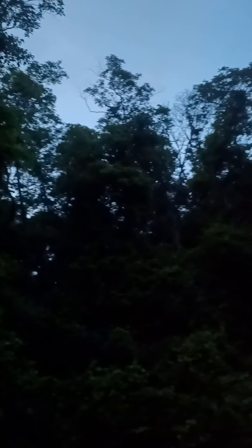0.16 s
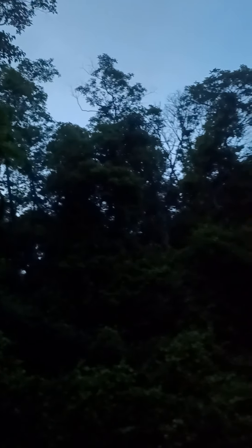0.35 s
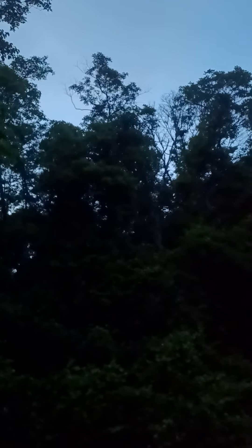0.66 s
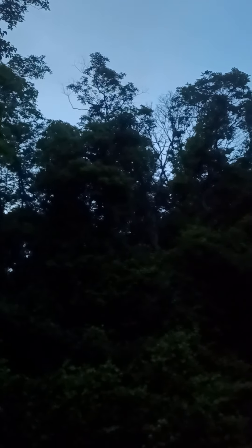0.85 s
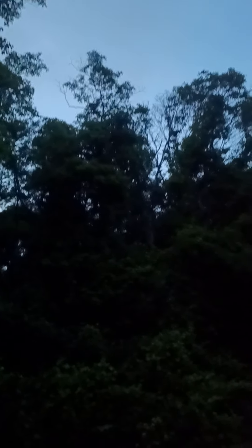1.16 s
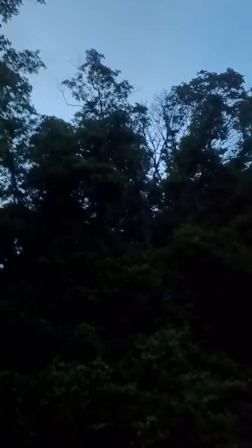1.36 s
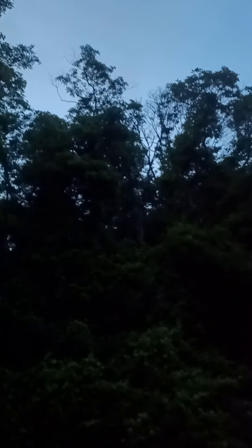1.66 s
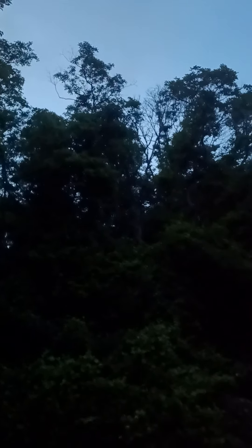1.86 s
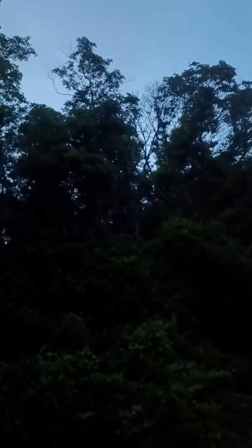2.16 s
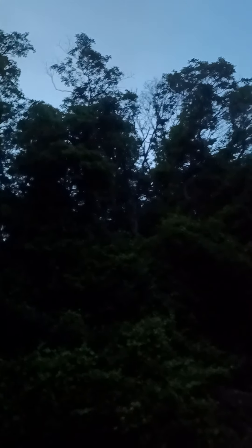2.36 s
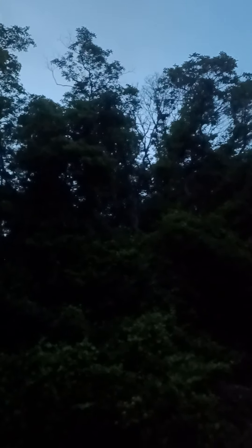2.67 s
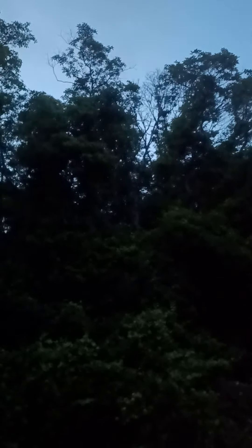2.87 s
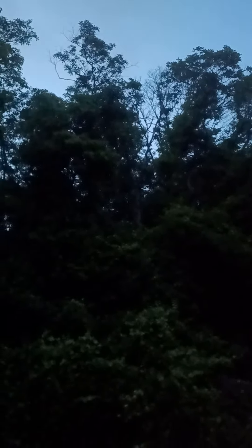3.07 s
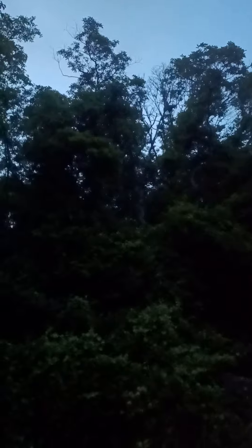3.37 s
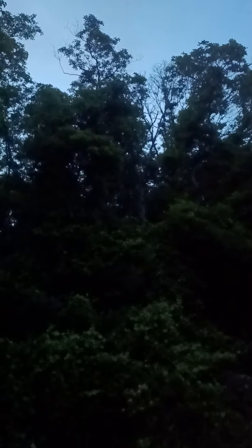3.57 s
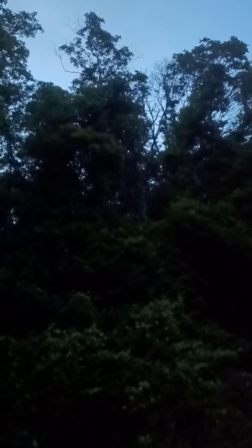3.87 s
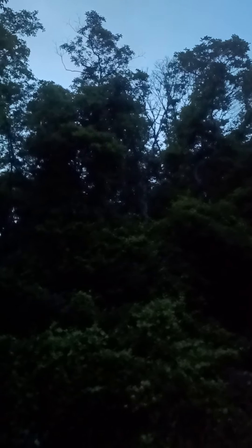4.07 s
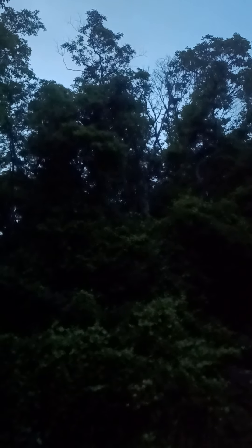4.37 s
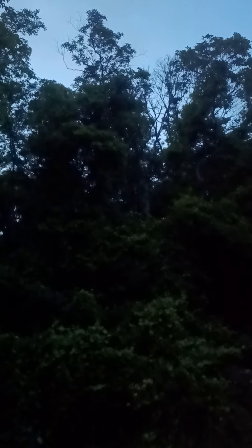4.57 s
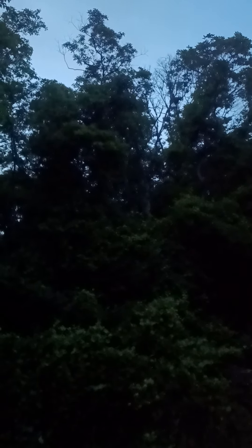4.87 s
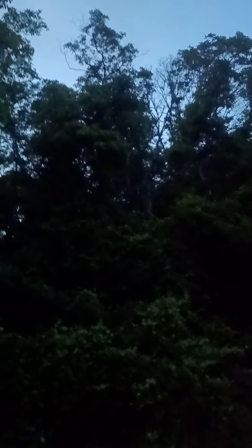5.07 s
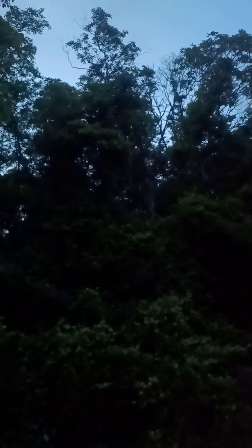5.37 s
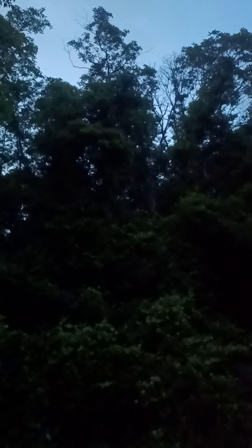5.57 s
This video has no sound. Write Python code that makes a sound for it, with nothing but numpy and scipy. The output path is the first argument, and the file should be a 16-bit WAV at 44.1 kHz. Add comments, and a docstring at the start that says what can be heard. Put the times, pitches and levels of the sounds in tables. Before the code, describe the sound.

A nightjar sings two clear, rolling whistled phrases in an echoing wood at dusk, with distant treefrog trills, a faint high insect tone and soft hiss.

```python
"""A forest edge at dusk: a chuck-will's-widow sings twice while the echo of an earlier phrase still fades.
Each phrase is a falling chuck, a swooping whistle, a brief hiccup and a second swooping whistle: gliding tones
whose overtones grow with pitch, heard directly, in echoes off trunks and in a diffuse tail from foliage.
Treefrogs trill further off as trains of short rising pulses; shaped noise makes the far frogs, thin high
insects, low distant rumble, microphone hiss, one faint rustle and a soft bump that dies away at the start."""
import sys
import numpy as np
from scipy import signal
from scipy.fft import rfft, irfft, next_fast_len
from scipy.io import wavfile
from scipy.ndimage import map_coordinates

SR = 44100
rng = np.random.default_rng(int(sys.argv[2]) if len(sys.argv) > 2 else 0)


def to_wav(sig):
    """Store sig (one row per channel, or 1-D mono) as 16-bit WAV at the path in sys.argv[1].

    Samples outside -1..1 are clipped; the rate is SR.
    """
    pcm = np.clip(np.atleast_2d(sig), -1, 1) * 32767
    pcm = np.round(pcm).astype(np.int16)
    wavfile.write(sys.argv[1], SR, pcm.T)  # frames by channels


N = 252687  # length in samples

# Notes, before the song's pitch and length ratios: length, attack and release in s,
# and base pitch f/Hz at start, middle and end.
# Swoop columns: peak t/s into the note, height f/Hz, rise t/s, fall t/s, accent level/dB
CHUCK = dict(length_s=.04, attack_s=.002, release_s=.0187, base_hz=(1200, 1160, 1120),
         swoops=[(0, 1280, .015, .0215, 0)])
WILL = dict(length_s=.259, attack_s=.046, release_s=.0164, base_hz=(1187, 1163, 1106),
        swoops=[(.1125, 1380, .018, .009, -1.5), (.17, 594, .0117, .0258, 3.7),
        (.2264, 490, .0161, .0196, 1.8)])
HICCUP = dict(length_s=.0262, attack_s=.013, release_s=.0073, base_hz=(1250, 1233, 1192), swoops=[])
WIDOW = dict(length_s=.238, attack_s=.026, release_s=.05, base_hz=(1103, 1292, 880),
         swoops=[(.0516, 73, .0104, .0194, 2.8), (.1105, 1290, .0145, .009, -4.5),
         (.1559, 581, .0086, .0148, -4.5)])
# Order of notes in a phrase, t before the length ratio.
# Columns: t/s into the phrase, note, level/dB, overtone level/dB, foliage echo level/dB
PHRASE = [(0, CHUCK, -34.6, -6, 4), (.307, WILL, -28.3, -1.5, .5), (.633, HICCUP, -22, 0, -5),
          (.6935, WIDOW, -26.5, 1.2, .6)]
# Phrases sung. Columns: start t/s, level/dB, pitch ratio, length ratio
SONG = [(-.94, .5, .97, 1.0), (2.2925, 0, 1.0, 1.0), (4.3505, -.3, 1.003, .9887)]
# Echoes from single trunks. Columns: delay t/s, level/dB, lead of the left microphone t/s
TRUNK_ECHOES = [(.00517, -10, -.00011), (.01517, -14.5, -.00031), (.02372, -16, 0),
                (.03407, -16.5, -.00021), (.07087, -18, -.0048), (.0758, -26, -.0003), (.1169, -26, .0001)]
# Reverberation of the near foliage and of the deep wood. Columns: f/Hz, time to decay 60 dB t/s
FOLIAGE_DECAY = [(900, 0.34), (1800, 0.46), (5000, 0.61), (12000, 0.36)]
DEEP_WOOD_DECAY = [(900, 1.32), (1800, 1.045), (5000, 1.8), (12000, 1.5)]
# Stereo balance of the bird. Columns: f/Hz, left minus right level/dB
BIRD_BALANCE = [(1200, 4.5), (1750, -3.5), (2300, -0.3), (4500, -7.5), (8000, -6.5), (12000, -7.5)]


def nightjar(direct_db=0.03, lead_s=-0.000085, deep_db=-15):
    """Multipath propagation: direct sound, trunk echoes and scattering add, the right microphone leading."""
    song, near = np.zeros(N + SR), np.zeros((2, N + SR))
    for start, gain_db, pitch, stretch in SONG:
        for offset, note, db, edge_db, scatter_db in PHRASE:
            s = start + offset * stretch
            tone = amp(gain_db + db) * whistle(note, pitch, stretch, edge_db)
            add(song, s, tone)
            # every note has its own randomly drawn diffuse tail
            scattered = filtered(np.pad(tone, (0, SR // 2)), leaf_scattering)
            echo = amp(-5) * scatter(scattered, FOLIAGE_DECAY, rise_s=.01)
            add(near, s, amp(scatter_db) * echo)

    def clear_paths(hz):
        trunks = sum(amp(db) * arrival(hz, delay, lead) for delay, db, lead in TRUNK_ECHOES)
        return (amp(direct_db) + trunks) / leaf_scattering(hz)

    def bearing(hz):
        balance = along(BIRD_BALANCE, hz) * np.array([[.5], [-.5]])
        return arrival(hz, 0, lead_s) * amp(balance)

    clear = filtered(song, clear_paths)
    far = amp(deep_db) * scatter(song, DEEP_WOOD_DECAY, rise_s=0.046)
    return filtered(clear + near + far, bearing)[:, SR:]


def leaf_scattering(hz):
    """Scattering by small bodies: leaves take short waves out of the clear paths and scatter them."""
    return amp(along([(2600, 0), (10000, 6)], hz))


# Overtones under full strain, before throat colour. Columns: multiple of the pitch, level/dB
OVERTONES = [(2, -38.5), (3, -39), (5, -44), (6, -52.5), (7, -53)]
# Throat colour of the overtones and rasp. Columns: f/Hz, level/dB
THROAT = [(2800, -11), (3700, -8), (4450, 10), (5300, 5), (6000, -7), (6800, -1.5), (8000, -6), (9300, 0),
          (10800, 6), (12000, 2), (14000, 2), (15700, -6)]


def whistle(note, pitch, stretch, edge_db, strain_power=4.5, bright_hz=2200,
            waver=.0065, flutter_db=.9, rasp_db=-44):
    """Source and filter: a nearly pure tone gains throat-coloured overtones and rasp as its pitch rises."""
    hz, loudness = gesture(stretch, **note)
    glide, size = hz * pitch, len(hz)
    wavering = glide * (1 + waver * wobble(300, size))
    phase = 2 * np.pi * np.cumsum(wavering) / SR
    strain = amp(edge_db) * np.minimum(glide / bright_hz, 1) ** strain_power
    overtones = sum(amp(level + along(THROAT, k * glide)) * np.sin(k * phase) for k, level in OVERTONES)
    breath = filtered(rng.standard_normal(size), lambda f: amp(along(THROAT, f)))
    rasp = amp(rasp_db) * unit(breath)
    flutter = amp(flutter_db * wobble(150, size))
    return np.sqrt(2) * loudness * flutter * (np.sin(phase) + strain * (overtones + rasp))


# The whistle carries best mid-range. Columns: f/Hz before the pitch ratio, level/dB
CARRY = [(950, -13), (1200, -8.2), (1400, -6.3), (1700, 2.1), (2050, 1.2), (2370, -10)]


def gesture(stretch, length_s, attack_s, release_s, base_hz, swoops, ceiling_hz=2400, knee=20):
    """Frequency and amplitude modulation: an arched pitch swoops up and back under a swell and fade."""
    t = np.arange(int(length_s * stretch * SR)) / SR / stretch
    arch = np.polyfit([0, .5, 1], base_hz, 2)
    hz = np.polyval(arch, t / length_s)
    loudness = np.minimum(t / attack_s, 1) * np.minimum((length_s - t) / release_s, 1)
    for peak, height, rise, fall, accent_db in swoops:
        upswing = 1 / np.cosh((t - peak) / rise)  # gathers speed
        drop = np.exp(-((t - peak) / fall) ** 2)
        push = np.where(t < peak, upswing, drop)
        hz = hz + height * push
        loudness = loudness * amp(accent_db * push)
    # the highest swoops flatten against the top of the bird's range, set before the pitch ratio
    hz = hz / (1 + (hz / ceiling_hz) ** knee) ** (1 / knee)
    return hz, loudness * amp(along(CARRY, hz))


# Treefrog trills. Columns: first pulse t/s, last pulse t/s, mean pulse rate/(1/s), nominal pitch f/Hz,
# fundamental level/dB, octave level/dB, clear path level/dB
TRILLS = [(.375, 1.045, 19.4, 1119, -60.5, -63.5, -4.5), (.945, 1.431, 18.4, 1081, -97, -62, 2),
          (1.492, 2.237, 18.8, 1168, -57.8, -60.5, -2.5), (3.535, 4.131, 18.4, 1051, -67.5, -60, 1),
          (4.185, 4.345, 18.8, 1145, -63.5, -67, -7), (5.435, 5.700, 18.9, 1146, -83, -60, -4.5)]


def treefrogs(pulse_s=0.025, sweep=.19, slowing=.04, detuning=0.0065, scatter_db=2.2, wet_db=-1.3, left_db=-3):
    """Pulse trains: each trill is a slowing row of rising two-partial pulses, heard directly and as echo."""
    sung, clear = np.zeros((2, N + SR))
    u = np.linspace(0, 1, int(pulse_s * SR))
    for first, last, rate, hz, low_db, octave_db, open_db in TRILLS:
        progress = np.linspace(0, 1, round((last - first) * rate) + 1)
        times = first + (last - first) * progress * (1 - slowing * (1 - progress))
        for s in times:
            size, detune = rng.standard_normal(2)
            glide = hz * (1 + detuning * detune + sweep * (u - .5))
            phase = 2 * np.pi * np.cumsum(glide) / SR
            partials = amp(low_db) * np.sin(phase) + amp(octave_db) * np.sin(2 * phase)
            pulse = amp(scatter_db * size) * np.sin(np.pi * u) ** 2 * partials
            add(sung, s - pulse_s / 2, pulse)
            add(clear, s - pulse_s / 2, amp(open_db) * pulse)
    echo = amp(wet_db) * scatter(sung, FOLIAGE_DECAY, rise_s=0.026)
    return (clear + echo)[:, SR:] * balance_gain(left_db)


# Far frogs: spectrum. Columns: f/Hz, level/dB
CHORUS_SPECTRUM = [(750, -27), (950, -11.5), (1130, -2), (1300, -7), (1550, -29), (1850, -14), (2200, -1.5),
                   (2480, -12), (2800, -34), (3500, -68)]
# Far frogs: slow swell and ebb. Columns: t/s, level/dB
CHORUS_LEVEL = [(0, -66), (1.2, -71.5), (2.6, -64.5), (4.3, -68.5), (5.7, -68.5)]


def far_frogs(throb_db=2):
    """Incoherent superposition: many distant trills merge into two throbbing bands of noise."""
    throb = throb_db * wobble(36, N)
    return amp(curve(CHORUS_LEVEL) + throb) * rush(CHORUS_SPECTRUM, left_db=-1.5)


# Insect chorus spectrum. Columns: f/Hz, level/dB
INSECT_SPECTRUM = [(3700, -42.5), (4150, -5), (4450, 2.5), (4800, 10.5), (5250, -2), (5550, -31),
                   (6200, -32.5)]


def insects(db=-81.7, shimmer_db=1.0):
    """Band-limited noise: a thin, steady high chorus with a slight shimmer."""
    return amp(db + shimmer_db * wobble(60, N)) * rush(INSECT_SPECTRUM, left_db=-5.5)


# Rustle spectrum. Columns: f/Hz, level/dB
RUSTLE_SPECTRUM = [(7000, -30), (11000, -8), (14000, 0), (15700, -2)]


def rustle(s=2.54, width_s=.055, db=-82):
    """Noise burst: a Gaussian envelope shapes one faint airy rustle close by."""
    envelope = np.exp(-((np.arange(N) / SR - s) / width_s) ** 2)
    return amp(db) * envelope * rush(RUSTLE_SPECTRUM, left_db=0)


# Spectrum of a hand on the case. Columns: f/Hz, level/dB
BUMP_SPECTRUM = [(25, -25), (40, -8), (50, 5), (65, 2.5), (130, 3), (220, -43), (500, -54)]


def handling(db=-51, t60_s=1.2):
    """Exponential decay: a soft low bump dies away from the start as the hand settles."""
    return amp(db - 60 * np.arange(N) / SR / t60_s) * rush(BUMP_SPECTRUM, left_db=-1)


# Distant rumble: spectrum. Columns: f/Hz, level/dB
RUMBLE_SPECTRUM = [(25, -22), (42, -22), (54, -5.5), (86, -3.5), (119, -0.5), (135, -2), (184, -14.5),
                   (240, -10.5), (291, -16), (331, -22.5), (367, -23.5), (450, -26.5), (733, -31),
                   (900, -26.5), (1170, -53.5), (1980, -120)]
# Distant rumble: course over time, before an overall offset. Columns: t/s, relative level/dB
RUMBLE_LEVEL = [(0, -63.7), (0.5, -64.2), (1.1, -63.3), (1.6, -64.0), (2.2, -64.6), (2.9, -60.1),
                (3.5, -66.2), (4.2, -65.9), (4.95, -61.2), (5.4, -66.0), (5.7, -68.0)]
# Microphone hiss spectrum. Columns: f/Hz, level/dB
HISS_SPECTRUM = [(500, 6), (1500, 5), (3200, 1.5), (6000, -3), (8000, -3.5), (11000, 0), (13500, 2),
                 (15700, -.5)]


def background(rumble_db=1.5, hiss_db=-83, lumps_db=1.5):
    """Stationary and modulated noise: steady microphone hiss beneath an uneven low distant rumble."""
    level = amp(rumble_db + curve(RUMBLE_LEVEL) + lumps_db * wobble(12, N))
    rumble = level * rush(RUMBLE_SPECTRUM, left_db=3.5)
    return rumble + amp(hiss_db) * rush(HISS_SPECTRUM, left_db=1.4)


def arrival(hz, delay, lead):
    """Phase delay: response of one path at two microphones, the left ahead by lead seconds."""
    return np.exp(-2j * np.pi * hz * (delay + np.array([[-lead], [lead]]) / 2))


def scatter(x, decay, rise_s):
    """Diffuse reverberation: countless leaves and twigs answer as noise decaying at each frequency's rate."""
    hz, t, z = signal.stft(noise_pair(SR), SR, nperseg=256)
    fade = amp(-60 * t / along(decay, hz)[:, None])
    build_up = 1 - np.exp(-t / rise_s)
    tail = signal.istft(z * fade * build_up, SR, nperseg=256)[1]
    tail = tail / np.linalg.norm(tail[0])
    return signal.fftconvolve(x[None], tail, axes=1)[:, :len(x)]


# Coherence of diffuse sound. Columns: f/Hz, left-right likeness (1 = identical)
LIKENESS = [(60, .95), (125, .85), (250, .55), (500, .35), (1100, .6), (2200, 0.35), (4000, .1),
            (12000, .05)]


def noise_pair(size):
    """Spatial coherence: diffuse noise is alike at both microphones in the bass, unrelated in the treble."""
    def mid_side(hz):
        turn = np.arccos(np.clip(along(LIKENESS, hz), -1, 1)) / 2
        return np.array([np.cos(turn), np.sin(turn)])

    mid, side = filtered(rng.standard_normal((2, size)), mid_side)
    return np.array([mid + side, mid - side])


def rush(spectrum, left_db):
    """Spectral shaping: coloured stereo noise of rms 1."""
    coloured = filtered(noise_pair(N), lambda hz: amp(along(spectrum, hz)))
    return unit(coloured * balance_gain(left_db))


def balance_gain(left_db):
    """Level difference: gains that set left above right by left_db."""
    return amp([[left_db / 2], [-left_db / 2]])


def amp(db):
    """Logarithmic level: decibels to gain."""
    return 10 ** (np.asarray(db) / 20)


def unit(x):
    """Mean power: x scaled to rms 1."""
    return x / np.sqrt(np.mean(x ** 2) + 1e-20)


def along(points, hz):
    """Logarithmic frequency scale: (f/Hz, value) points interpolated at hz."""
    f, v = np.transpose(points)
    return np.interp(np.log(hz + 1), np.log(f + 1), v)


def curve(rows):
    """Linear interpolation: (t/s, value) rows to one value per sample."""
    return np.interp(np.arange(N) / SR, *np.transpose(rows))


def wobble(rate, size):
    """Slow random modulation: a smooth curve through rate random knots a second."""
    knots = rng.standard_normal(int(size * rate / SR) + 4)
    return map_coordinates(knots, [np.arange(size) * rate / SR])


def filtered(x, response):
    """Linear filtering: the spectrum of x times a response of frequency."""
    size = x.shape[-1]
    m = next_fast_len(size + SR // 2)
    return irfft(rfft(x, m) * response(np.fft.rfftfreq(m, 1 / SR)), m)[..., :size]


def add(track, s, sound):
    """Superposition: mix a sound at s seconds into a track that begins one second early."""
    part = track[..., round((s + 1) * SR):][..., :sound.shape[-1]]
    part += sound[..., :part.shape[-1]]


def scene():
    """Superposition of all sources at the forest edge."""
    animals = nightjar() + treefrogs() + far_frogs() + insects()
    return animals + rustle() + handling() + background()


def record(dry, low_cut_hz=49, top_hz=15730):
    """Band limiting: the deepest bass is cut and nothing remains from top_hz upward."""
    return filtered(dry, lambda hz: (hz < top_hz) * (1 - 1 / (1 + (hz / low_cut_hz) ** 6)))


dry = scene()
out = record(dry)
to_wav(out)
```